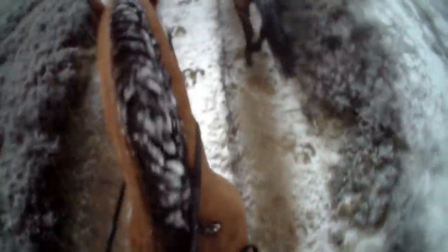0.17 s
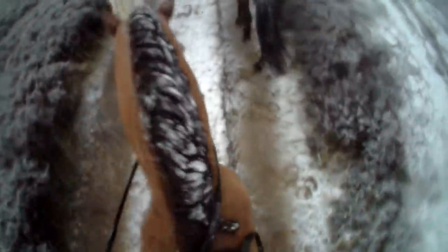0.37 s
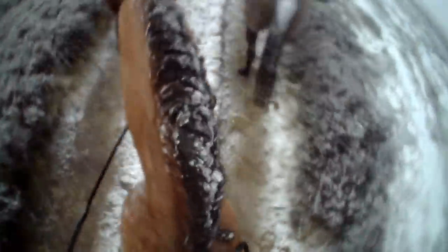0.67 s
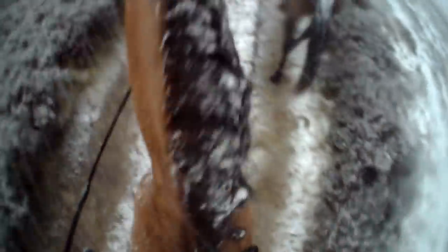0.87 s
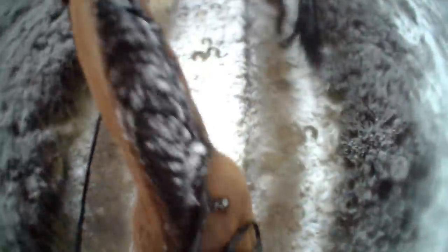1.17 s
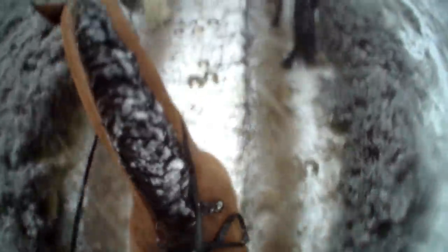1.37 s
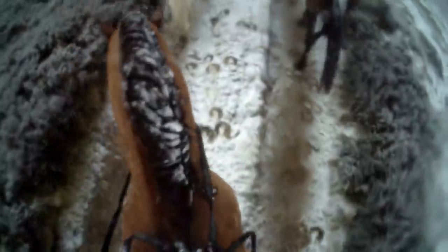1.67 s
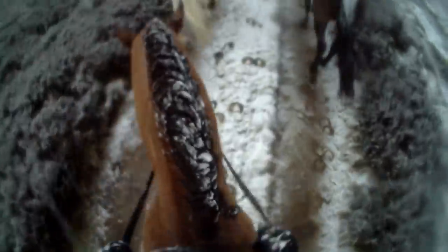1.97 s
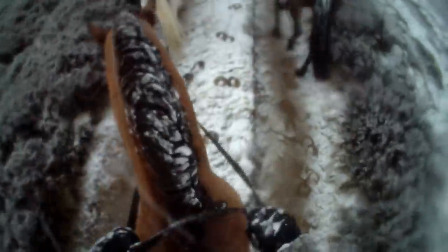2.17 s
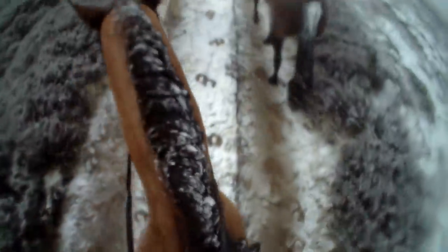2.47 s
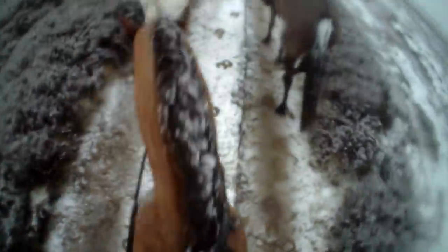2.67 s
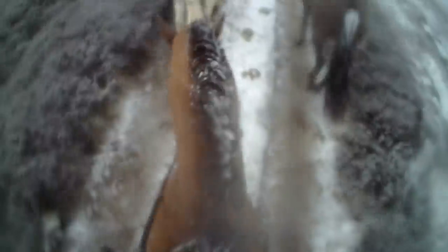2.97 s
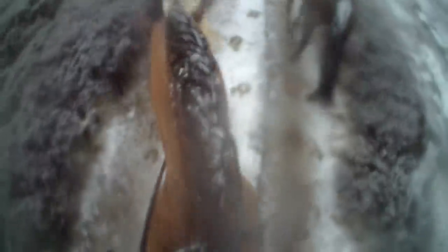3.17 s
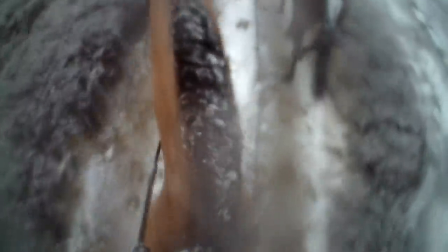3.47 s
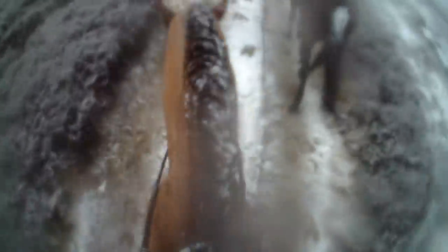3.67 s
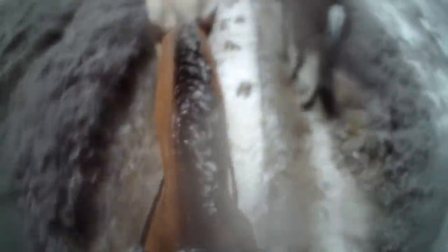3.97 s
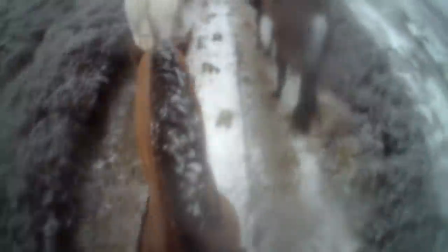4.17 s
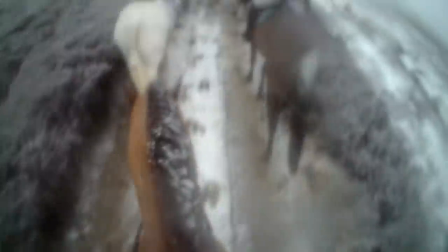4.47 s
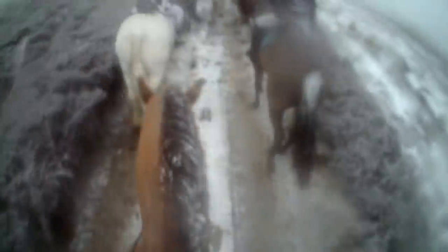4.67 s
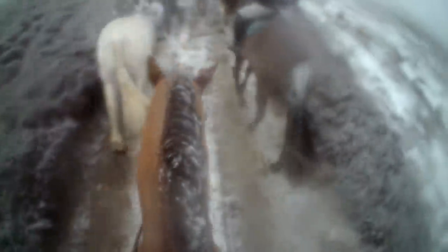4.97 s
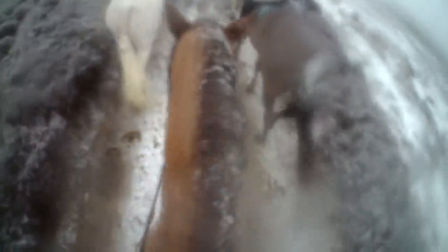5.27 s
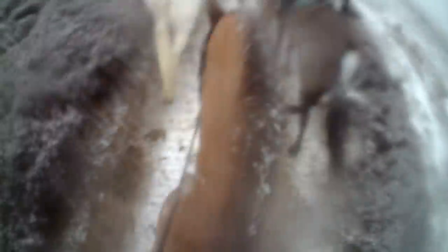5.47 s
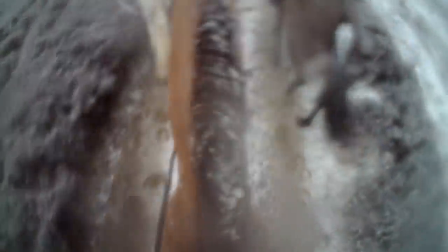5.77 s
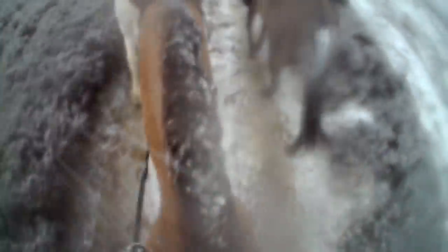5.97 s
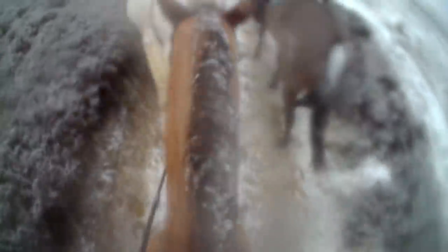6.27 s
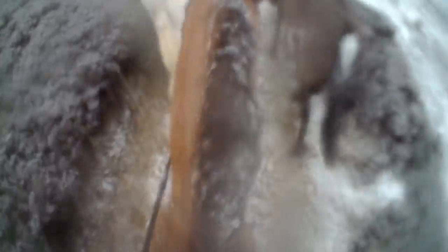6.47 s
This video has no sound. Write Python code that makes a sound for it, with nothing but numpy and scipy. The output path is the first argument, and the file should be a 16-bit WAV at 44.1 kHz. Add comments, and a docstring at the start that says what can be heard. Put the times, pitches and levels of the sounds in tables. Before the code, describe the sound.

Harsh, distorted wind rush outdoors, low and muffled, thumping and fluttering as gusts rise, drop away suddenly and return.

```python
"""Strong wind in a snowstorm, heard at the port of a small camera carried on horseback.
It opens strong with two quick lulls, drops near 0.5 s, then blows hard to 1.1 s before easing.
It peaks again near 3.2 s, sinks through short gusts and lulls to its weakest near 5.8 s, and returns.
Shaped noise makes a rush and deeper buffeting; they overload the input, so gusts get harsher, hardly louder.
Coarse sampling leaves a dull roar with a thin fizz above it."""
import sys
import numpy as np
from scipy import signal
from scipy.fft import rfft, irfft
from scipy.io import wavfile

SR = 44100
rng = np.random.default_rng(int(sys.argv[2]) if len(sys.argv) > 2 else 0)


def int16_out(signal):
    """Quantize to a 16-bit WAV file."""
    q = np.round(np.clip(np.atleast_2d(signal).T, -1, 1) * 32767)
    wavfile.write(sys.argv[1], SR, q.astype(np.int16))


N = 291942
TIME = np.arange(N) / SR  # s
FREQS = np.fft.rfftfreq(N, 1 / SR)  # Hz


def gain_of(db):
    """Decibels to amplitude."""
    return 10 ** (np.asarray(db) / 20)


def curve(rows):
    """Join (time, value) points by straight lines, sample by sample."""
    times, values = np.transpose(rows)
    return np.interp(TIME, times, values)


def noise(gains):
    """Noise of rms 1, shaped by a gain at each frequency."""
    white_spectrum = rfft(rng.standard_normal(N))
    shaped = irfft(white_spectrum * gains, N)
    return shaped / shaped.std()


def spectrum(points):
    """Gains from (f/Hz, level/dB) points joined on a log-frequency axis."""
    hz, db = np.transpose(points)
    return gain_of(np.interp(np.log(FREQS + 1), np.log(hz), db))


def flutter(rate_hz):
    """Random wavering of rms 1, densest a little below the given rate."""
    return noise(FREQS / (1 + (FREQS / rate_hz) ** 4))


def swell(at, length):
    """A bell-shaped rise and fall of height 1; the length is taken at half height."""
    half_lengths = 2 * (TIME - at) / length
    return 0.5 ** (half_lengths ** 2)


def wind(rush_db=-0.95, eddy_db=-0.5, flutter_db=1.4, burst_db=2.0):
    """Pressure at the port: rush and eddies ride on a drifting, fluttering wind, broken by lulls and gusts."""
    # wind strength at the port, before the rush and eddy trims: t/s, level/dB (0 dB = overload point)
    strength_points = [(0, 6.5), (.48, 0.5), (.65, 9), (1.07, 9.5), (1.4, 4.5), (1.95, 4.5), (2.33, 6),
                       (3.23, 10), (4.2, 4), (4.73, 2.5), (5.02, 5.5), (5.77, 0.5), (6.23, 6.5), (6.6, 5.5)]
    # spectral shape of the fine turbulence in the port: f/Hz, level/dB (density, relative)
    rush_spectrum = [(20, -3), (200, 0.5), (450, 1.5), (700, 0), (1100, -2), (1450, -7.5), (1900, -21.5),
                     (2600, -29), (4000, -55), (8000, -78)]
    # spectral shape of the large eddies' pressure: f/Hz, level/dB (density, relative)
    eddy_spectrum = [(15, -5), (90, 1.5), (220, -1), (450, -8), (900, -23), (2000, -84), (4000, -80)]
    eddy_follow = 0.71  # share of a lull's or gust's dB that the large, slow eddies follow

    strength = gain_of(curve(strength_points) + flutter_db * flutter(rate_hz=20.4))
    quick_db = lulls_and_gusts()

    # fine turbulence is intermittent: it arrives in bursts a few milliseconds long
    burst_gain = gain_of(rush_db + quick_db + burst_db * flutter(rate_hz=89))
    rush = burst_gain * noise(spectrum(rush_spectrum))

    eddy_gain = gain_of(eddy_db + eddy_follow * quick_db + eddy_level())
    eddies = eddy_gain * noise(spectrum(eddy_spectrum))
    return strength * (rush + eddies)


def eddy_level(lump_db=3.0):
    """Weight in dB of eddies shed by the camera body: a slow drift, heavy buffets and many small lumps."""
    # drift of the large eddies, before their trim: t/s, level/dB
    drift = [(0, -5), (1.2, -4), (2.0, -9.5), (2.45, -2), (3.1, -0.9), (4.3, -8.5), (5.3, -8.5),
             (5.6, -0.8), (6.6, -1)]
    # single heavy eddies that thump the port: t/s (peak), level/dB (added to the drift)
    buffets = [(.54, 6.5), (.85, 8.5), (1.63, 7), (2.33, 4.5), (4.0, 9), (4.38, 4), (5.7, 1), (6.12, 5),
               (6.52, 6.5)]
    buffet_s = 0.13  # length at half height
    buffet_db = sum(db * swell(at, buffet_s) for at, db in buffets)
    return curve(drift) + buffet_db + lump_db * flutter(rate_hz=11.4)


def lulls_and_gusts():
    """Quick changes of the wind in dB, each a bell-shaped dip or rise."""
    # sudden lulls, when the wind slips off the port: t/s (deepest), length/s, level/dB (change)
    lulls = [(0.193, 0.046, -12), (0.327, 0.061, -9), (1.484, 0.055, -7.5), (1.74, 0.056, -7),
             (2.345, 0.06, -8.5), (2.893, .1, -5), (3.73, 0.075, -5), (4.398, 0.022, -2), (4.72, .16, -5),
             (5.09, 0.1, -2), (5.339, 0.074, -10.5), (5.615, 0.063, -4), (5.774, .015, -8),
             (6.016, 0.022, -10), (6.518, 0.028, -5)]
    # short gusts on top of the wind: t/s (peak), length/s, level/dB (change)
    gusts = [(1.23, 0.018, 7), (1.828, 0.029, 5), (2.05, 0.14, 5.5), (3.91, 0.077, 7), (5.689, 0.013, 11),
             (6.07, .08, 2.5)]
    return sum(db * swell(at, length) for at, length, db in [*lulls, *gusts])


def scene():
    """The wind at the port is the only source, on one channel."""
    return wind()[None]


def overload(x, knee=7.9, coupling_hz=7.2, ripple_db=-36.0):
    """The input stage flattens the peaks; its coupling capacitor makes the flat tops droop."""
    ceiling_db = -22.5  # output level of the overload point
    flattened = x / (1 + abs(x) ** knee) ** (1 / knee)
    # the flat tops carry a slight hissy ripple
    ripple = gain_of(ripple_db) * flattened ** 2 * rng.standard_normal(N)
    b, a = signal.butter(1, coupling_hz, "high", fs=SR)
    return gain_of(ceiling_db) * signal.lfilter(b, a, flattened + ripple)


def coarse_sampling(x, guard_hz=5020.0, fizz_db=-76.0):
    """Slow samples joined by straight lines: the roar is mirrored faintly around the sampling rate."""
    recorder_hz = 8000
    b, a = signal.butter(3, guard_hz, fs=SR)
    guarded = signal.lfilter(b, a, x)
    ticks = np.arange(0, N / SR, 1 / recorder_hz)
    samples = np.interp(ticks, TIME, guarded)
    joined = np.interp(TIME, ticks, samples)
    # a faint even fizz lies under the mirrored bands
    return joined + gain_of(fizz_db) * rng.standard_normal(N)


def record(dry):
    """The microphone input overloads, the recorder samples coarsely, and a low-pass limits the band."""
    edge_hz = 15800
    low_pass = signal.firwin(1023, edge_hz, window=("kaiser", 9), fs=SR)
    sampled = coarse_sampling(overload(dry[0]))
    return signal.oaconvolve(sampled, low_pass, "same")[None]


dry = scene()
out = record(dry)
int16_out(out)
```